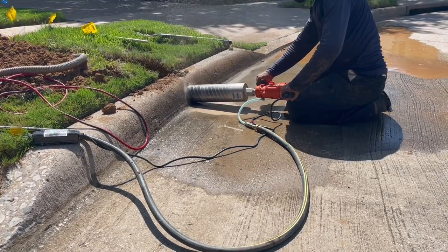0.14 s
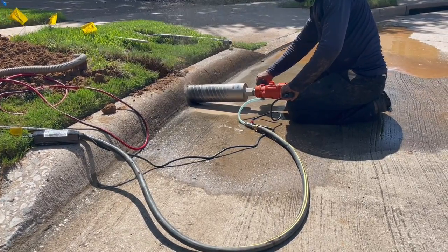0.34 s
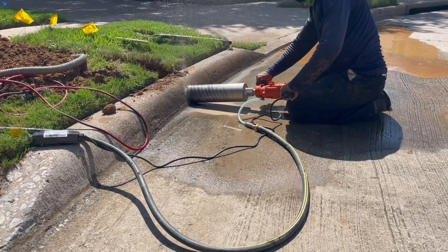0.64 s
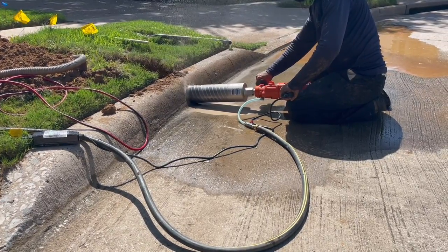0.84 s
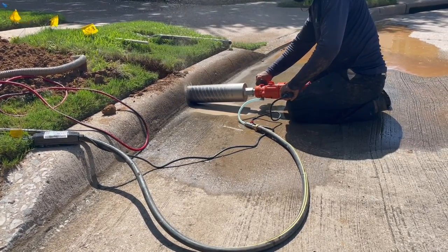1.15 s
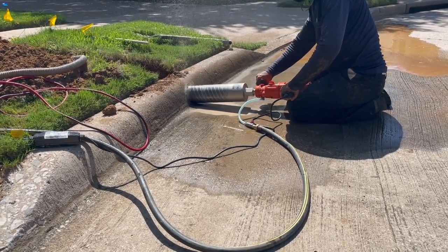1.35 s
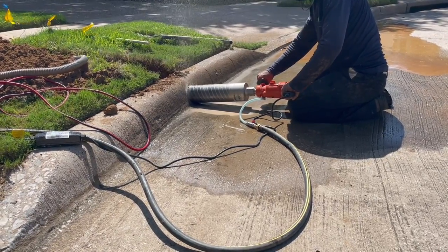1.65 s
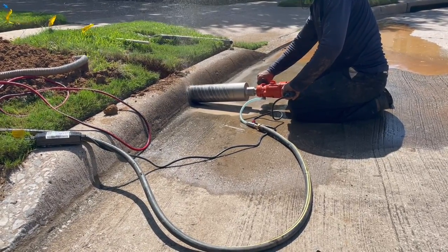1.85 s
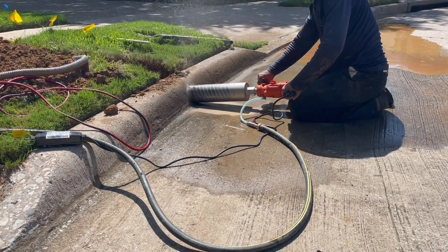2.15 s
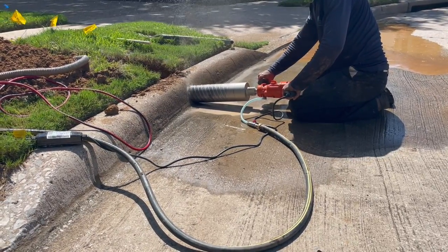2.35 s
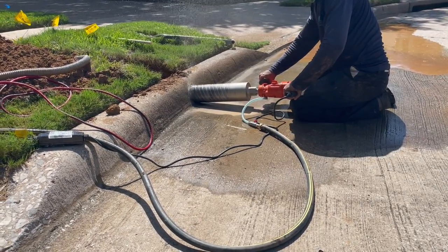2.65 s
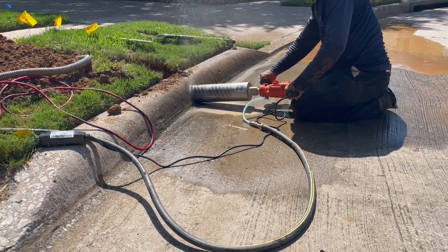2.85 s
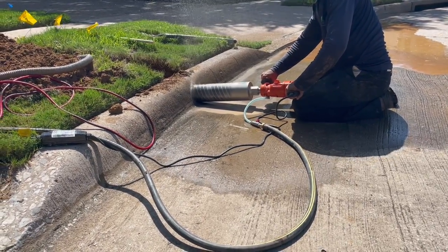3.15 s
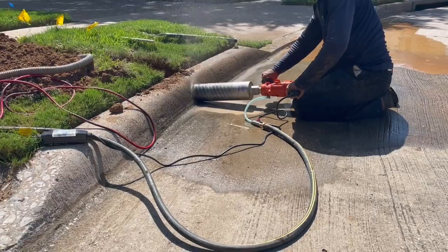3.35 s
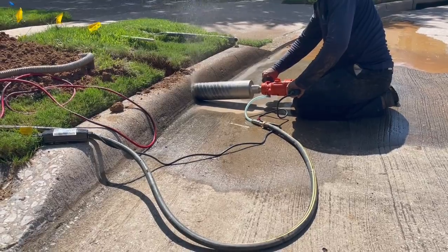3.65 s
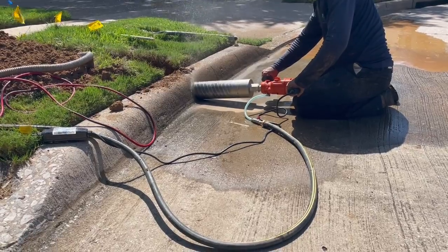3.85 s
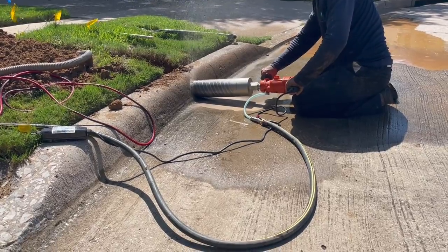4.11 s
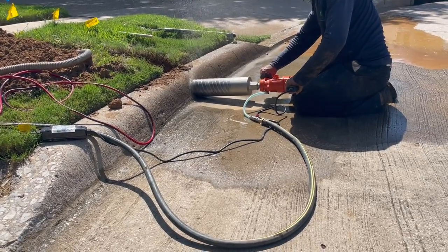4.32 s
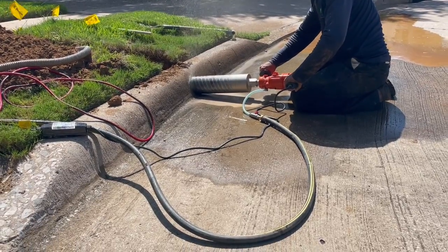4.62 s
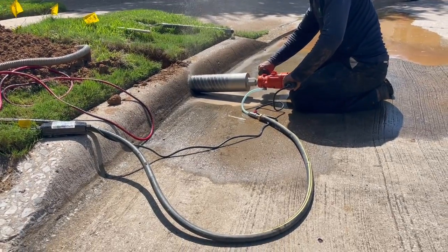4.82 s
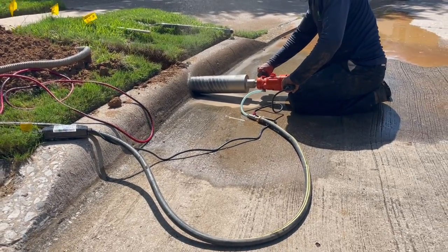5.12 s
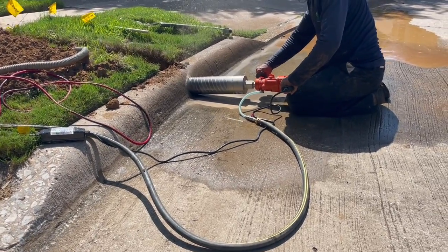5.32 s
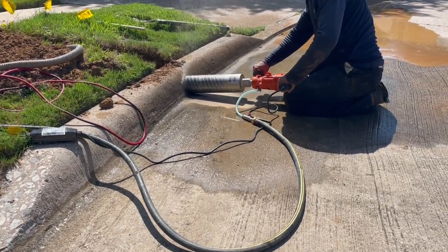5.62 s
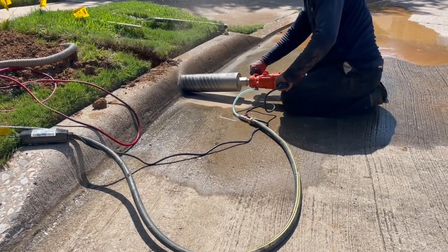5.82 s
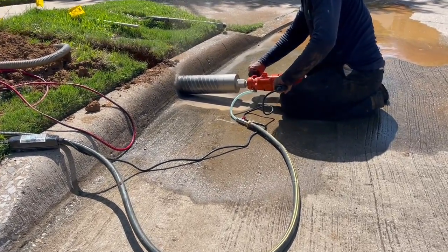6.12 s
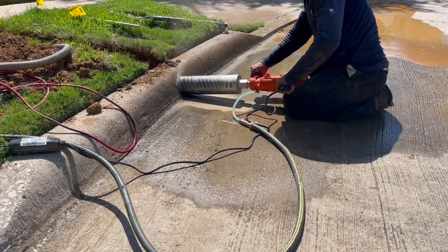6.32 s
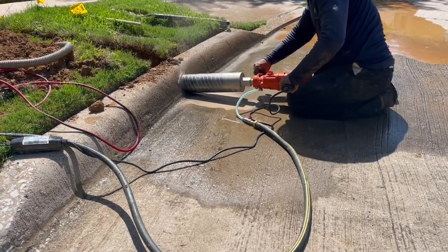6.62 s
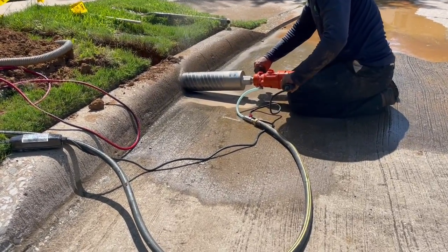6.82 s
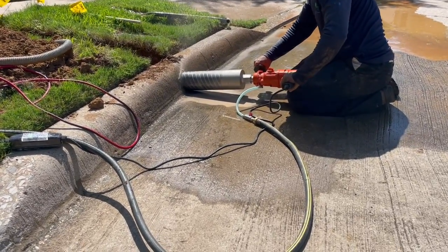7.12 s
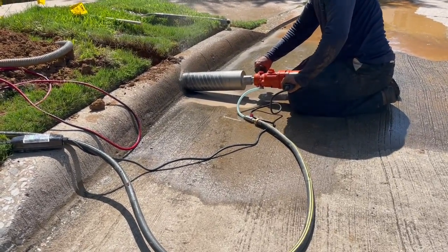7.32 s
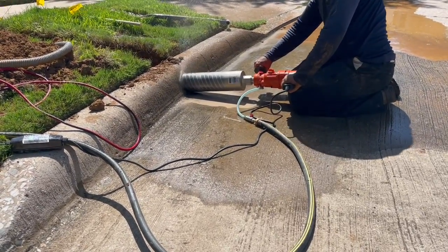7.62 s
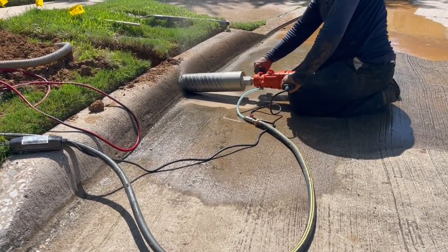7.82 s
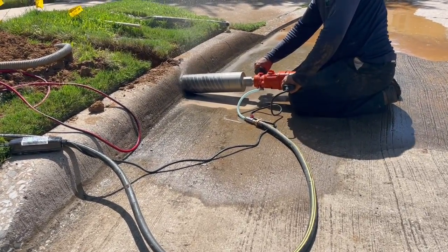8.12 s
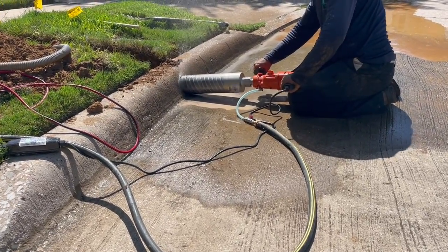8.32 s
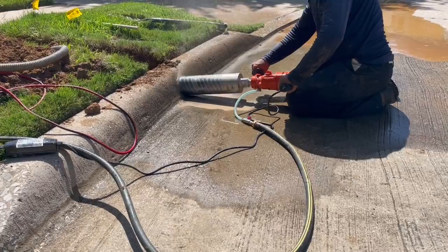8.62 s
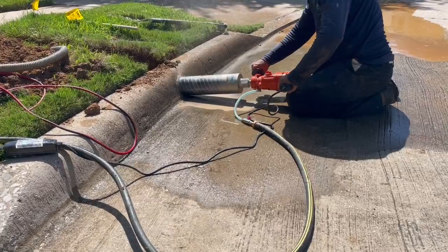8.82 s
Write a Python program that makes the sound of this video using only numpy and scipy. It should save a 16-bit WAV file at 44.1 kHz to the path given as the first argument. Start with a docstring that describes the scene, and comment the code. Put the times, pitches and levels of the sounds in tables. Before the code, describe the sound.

Outdoors at a street kerb, a handheld electric core drill grinds steadily into concrete with a wet steel barrel. Bright gritty hiss and ringing metal pulse rapidly with each turn, over a high gear whine and faint mains hum. After about five seconds it eases briefly, then runs faster and looser, rattling with knocks and snags. Soft low wind touches the nearby stereo microphone.

```python
"""Outdoors at a concrete kerb, a handheld electric core drill grinds with a wet diamond bit.
Noise for crushed grit rings filters for the steel barrel, which rubs its hole twice a turn and snags on stones.
Sine tones make the gear whine, mains hum, chatter and thin metallic tones; thuds and knocks shake the kerb.
Past halfway the bit is looser, runs faster and rattles harder. Low filtered noise is the light, puffing wind."""
import sys
import numpy as np
from scipy import signal
from scipy.fft import rfft, irfft, next_fast_len
from scipy.io import wavfile
from scipy.ndimage import uniform_filter1d, map_coordinates

SR = 44100
rng = np.random.default_rng(int(sys.argv[2]) if len(sys.argv) > 2 else 0)


def generate_wav(signal):
    """Clip the signal to [-1, 1] and save it as 16-bit WAV at the path in sys.argv[1]."""
    frames = np.transpose(np.atleast_2d(signal))
    scaled = np.clip(frames, -1, 1) * 32767
    pcm = np.round(scaled).astype(np.int16)
    wavfile.write(sys.argv[1], SR, pcm)


N = 395136  # length in samples

# motor speed: time_s, turns_per_s
MOTOR_SPEED = [(0.0, 461.5), (0.32, 459.5), (0.67, 477.5), (1.37, 480.0), (1.65, 488), (2.0, 504),
               (2.2, 504), (2.48, 494.5), (2.75, 495), (3.1, 503), (3.5, 515), (3.8, 514), (4.25, 505),
               (4.68, 507), (5.05, 488.5), (5.27, 489), (5.7, 530.5), (5.93, 522.5), (6.25, 537.5),
               (6.64, 534.0), (6.95, 561.5), (7.56, 565.5), (7.95, 547.5), (8.48, 547.5), (8.96, 529.0)]
# peaks and dips in how barrel, gearbox and hole ring: centre_hz, width_hz, snug_lift_db, loose_lift_db
BARREL_MODES = [(178, 40, 4, 4), (230, 230, 3.2, 9), (437, 66, 3, 4.2), (612, 195, 9, 10.2),
                (845, 230, 9, 7.5), (1012, 183, 6.5, 9), (1346, 230, 9.2, 7.7), (1558, 152, 2.4, -5.7),
                (1819, 139, 6.6, 5.2), (2245, 146, 4.7, 11.2), (2300, 116, -8, -6), (2470, 68, -2.8, 2),
                (2733, 200, -10, -1), (2892, 152, 6.8, 11.5), (2988, 80, 4, 8.6), (3110, 100, 8, 13),
                (3366, 126, 7.6, 14), (3513, 137, 6.6, 10.7), (3665, 82, 9, 10.2), (3908, 93, 10.2, 8.5),
                (4474, 173, 6, 4.2), (4684, 121, 11.2, 9.4), (4877, 191, 6.1, 7.9), (5094, 124, 7.3, 3.1),
                (5295, 206, -1.2, -3.6), (5386, 85, 9, 6.3), (5517, 153, 4.3, 5.1), (5649, 97, 8.8, 7.7),
                (5887, 45, 4.9, 4), (6005, 106, 4.3, 8.3), (6195, 150, 7.3, 7.1), (6342, 75, 3.1, 5.9),
                (6504, 230, 7.4, 7.6), (7868, 853, 5.5, 7.7)]
# broad tone colour of the grinding: pitch_hz, snug_db, loose_db
GRIT_SPECTRUM = [(50.0, -25.0, -25.0), (130.0, -5.8, -13.0), (350.0, -12.6, -11.8), (1100.0, -14.8, -13.9),
                 (1600.0, -8.5, 0.0), (2100.0, -2.4, -7.3), (2700.0, -3.4, -8.4), (3200.0, -4.0, -8.3),
                 (4200.0, -8.8, -6.1), (7000.0, -5.9, -6.2), (9600.0, -7.2, -5.0), (11000.0, -8.7, -5.2),
                 (13000.0, -12.6, -10.4), (15000.0, -10.9, -8.4)]
# the bit catches on a stone: time_s, strength_db (relative; catches() adds a shared boost)
CATCHES = [(2.141, -14), (3.6182, -15), (4.2323, -14.5), (4.4653, -18), (6.498, -15), (6.608, -14),
           (6.928, -15), (6.955, -12), (7.007, -14), (7.039, -14), (7.0948, -14), (7.387, -14),
           (7.762, -13), (7.787, -13), (7.816, -15.5), (8.1668, -13), (8.1963, -16), (8.2242, -15),
           (8.253, -13), (8.6108, -16), (8.7475, -17)]
# tones of gears and cutting segments: multiple_of_bit_speed, snug_db, loose_db (before a shared trim)
GEAR_TONES = [(5, -58, -57), (6, -62, -56), (12, -61, -57), (13, -60, -57), (16, -54, -56), (23, -54, -54),
              (27, -49.5, -46.5), (37.25, -58, -66), (41, -49.5, -60), (44, -56, -62), (46, -52.5, -55)]
# stereo colour of the drill: pitch_hz, left_minus_right_db, left_lead_rad, likeness_0_to_1
STEREO_COLOUR = [(100, .2, 0, .95), (700, 1.8, .21, .99), (1800, -1, 0, .97), (2250, 0, .05, .96),
                 (2480, -.8, .35, .76), (2650, .5, 1.3, .55), (2740, 1, 2.7, .7), (2900, 1.8, 2.8, .8),
                 (3100, 2.2, 2.3, .9), (3300, 3, 2.8, .8), (3470, 7, 2.1, .75), (3680, 8, 2.5, .68),
                 (3900, 2.8, 1, .78), (4200, 6, .7, .28), (4500, 4, .1, .7), (4700, 3.2, .7, .89),
                 (5080, 3, 1.4, .7), (5390, 6, 1.8, .52), (5650, 4.5, 4.78, .64), (5850, -1.2, 5.4, .6),
                 (6200, -1.5, 5.85, .89), (6550, .1, 5.9, .84), (6950, 0, 5.85, .66), (7450, 1.8, 3.3, .65),
                 (7700, 0, 3.23, 1), (8550, 0, 3.09, 1), (10100, 0, 1.38, .98), (10800, 0, 0, 1),
                 (12500, 0, -.05, 1), (12900, 0, -1.12, .98), (14300, 0, -3.13, 1)]
# tone colour of the wind: pitch_hz, relative_density_db_per_hz
WIND_SPECTRUM = [(15, -28), (28, -19), (45, -5.5), (62, 2), (100, -1), (160, -6), (400, -21), (1500, -80)]
# whine of the motor's small gear, before the casing boosts it: time_s, level_db
WHINE_LEVEL = [(.3, -55), (.7, -50), (1.4, -50.5), (2.1, -51), (3.6, -55), (4.2, -55), (4.6, -51),
               (5.1, -52), (5.7, -48), (6.7, -49), (7, -58), (8.9, -54)]
# the bit chatters on an overtone: centre_s, half_length_s, multiple_of_bit_speed, level_db (before a shared trim)
CHATTER = [(.3, .19, 20, -44), (.3, .19, 22, -45), (.3, .2, 5, -45.5), (5.9, .06, 7, -43),
           (6.53, .06, 6, -43), (7.7, 1, 23, -48), (7.8, 1.2, 16, -49), (8.68, .11, 16, -44)]
# thin metallic tones swell up: centre_s, half_length_s, pitch_hz, level_db (before a shared boost)
METALLIC_TONES = [(.15, .3, 4665, -41), (1.7, .35, 3895, -44), (2.3, .45, 3110, -41), (3.3, .6, 3905, -45),
                  (3.6, .2, 4700, -43.5), (3.65, .3, 6190, -41.5), (4.35, .15, 4695, -42),
                  (4.65, .15, 3915, -42), (5.15, .3, 3500, -42), (5.9, .5, 3520, -38.5),
                  (6.95, .3, 3380, -38.5), (8.13, .1, 2425, -44), (8.15, .15, 3380, -39),
                  (8.75, .25, 3380, -37.5)]
# edges between the bands of hole, slab, steel and fizz: edge_hz
BAND_EDGES = [480, 2400, 7200]
# how hard the drill is pushed: time_s, feed_db
FEED = [(0, -0.6), (1.4, -0.5), (2, 0.4), (2.4, 0), (3.6, 0.8), (4.4, 1), (5.3, -2.5), (5.7, -0.2),
        (6.55, 1), (6.75, -0.5), (7, 0.5), (7.62, 1.5), (7.78, 3), (8.35, 2.5), (8.65, 4), (8.96, 2)]
# the bit binds, or runs free if a lift is negative: centre_s, half_length_s, slab_lift_db, hole_lift_db
BINDS = [(0.233, 0.12, 3.5, 1.5), (0.443, 0.049, 4, 3), (1.898, 0.12, 1.5, 0.5), (3.687, .07, 1.5, 4.5),
         (5.102, 0.7, -2, -3), (5.885, 0.1, 5, 6.5), (6.11, 0.1, 4.5, 3), (6.416, 0.057, 2.5, 1.5),
         (6.54, 0.12, 3, 4), (7.06, 0.072, 3.5, 3.5), (8.673, 0.07, 0.5, 1)]
# the bit slams the wall of the hole: time_s, strength_db (over the grinding)
THUDS = [(3.659, 6), (3.709, 5), (3.825, 8.5), (5.21, 4.5), (5.889, 6), (5.918, 7), (6.122, 6), (6.418, 7),
         (6.526, 10), (6.554, 8), (8.167, 5), (8.225, 5.5), (8.704, 6)]
# ways the kerb rings under a slam: pitch_hz, relative_level_db (before each slam's random share)
KERB_MODES = [(210, -2), (400, -2), (600, 0), (860, 0), (1350, -2)]
# puffs of wind on the microphone: centre_s, half_length_s, level_db
PUFFS = [(0.097, .06, -48), (0.887, 0.14, -44), (1.54, .04, -43.5), (2.43, .025, -46), (3.502, 0.089, -47),
         (3.614, 0.023, -43), (4.61, 0.017, -39), (5.393, .025, -43), (7.338, 0.086, -46)]

GEAR_RATIO = 14.9  # motor turns for one turn of the bit
PINION_TEETH = 5
HUM_HZ = 120  # one cycle for each half wave of the mains
TOP_HZ = 15750  # nothing above this is kept
LOOSEN_S, LOOSEN_TAKES_S = 5.42, 0.8  # middle of the moment the bit works loose, and how long that takes
LOOSE_SHARPENS = .00245  # share by which the barrel's modes rise once it is loose
GROOVE_SHARE, GROOVE_LASTS_TURNS = .2, 7  # share of grit power that repeats each turn; turns until it is new
# levels at neutral feed (dB), their growth per dB of feed, and their change once the bit is loose (dB)
HOLE_DB, HOLE_PER_FEED, HOLE_LOOSE_DB = -47, 0.37, -0.16
SLAB_DB, SLAB_PER_FEED, SLAB_LOOSE_DB = -36.5, 0.53, 0
STEEL_DB, STEEL_PER_BIND = -32, 0.35  # steel follows the feed fully and takes this share of the slab's lift
CASING_HZ, CASING_WIDTH_HZ, CASING_DB = 2424, 140, 6.5  # gearbox resonance that boosts the passing whine
BREEZE_DB, BREEZE_EARLY_DB, BREEZE_EASES_S = -55.5, 4.5, 1.9  # base wind, its extra at first, time to ease
THUD_ATTACK_S, THUD_DECAY_S = .002, .006
CRUNCH_SHARE = .5  # share of a slam that crushes extra grit
KNOCK_DB, KNOCK_T60_S = -34.5, .028  # base level of a knock, and the time it takes to fall 60 dB


def amp(db):
    """Turn decibels into a gain."""
    return 10 ** (np.asarray(db) / 20)


def unit(x):
    """Scale to an rms (average strength) of 1."""
    return x / np.sqrt(np.mean(x ** 2) + 1e-20)


def along(points, hz):
    """Read each column of a spectrum table on a log frequency axis."""
    table_hz, *columns = np.transpose(points)
    return [np.interp(np.log(hz + 1), np.log(table_hz + 1), column) for column in columns]


def curve(rows):
    """Join (time, value) rows into one value per sample."""
    return np.interp(np.arange(N) / SR, *np.transpose(rows))


def wobble(rate):
    """A smooth random curve through this many random points a second."""
    points = rng.standard_normal(int(N * rate / SR) + 4)
    return map_coordinates(points, [np.arange(N) * rate / SR])


def swell(s, half):
    """A smooth bump of height 1 around time s."""
    distance = (np.arange(N) / SR - s) / half
    return np.exp(-np.minimum(distance ** 2, 20))


def filtered(x, response):
    """Change the strength and phase of each frequency in x."""
    size = next_fast_len(N + SR // 2, True)
    hz = np.fft.rfftfreq(size, 1 / SR)
    return irfft(rfft(x, size) * response(hz), size)[..., :N]


def band_rms(x, lo_hz, hi_hz):
    """Measure the strength of x inside one band."""
    return np.std(filtered(x, lambda hz: (hz > lo_hz) & (hz < hi_hz)))


def split(x):
    """Split x into four neighbouring bands that add up to it: hole, slab, steel and fizz."""
    lows = [filtered(x, lambda hz: 1 / (1 + (hz / edge) ** 10)) for edge in BAND_EDGES]
    return np.diff([np.zeros_like(x), *lows, x], axis=0)


def looseness():
    """Play of the bit in its hole: 0 while snug, 1 once it has worked loose."""
    return np.clip(.5 + (np.arange(N) / SR - LOOSEN_S) / LOOSEN_TAKES_S, 0, 1)


def tone(turns, stray_rad, flutter_db):
    """A sine of rms near 1 whose phase and strength waver."""
    phase = 2 * np.pi * turns + stray_rad * wobble(40)
    return np.sqrt(2) * np.sin(phase) * amp(flutter_db * wobble(25))


def stereo(pair):
    """The first signal goes left and right with a lead and a level gap; the second makes the sides less alike."""
    def paths(hz):
        balance_db, lead, alike = along(STEREO_COLOUR, hz)
        turn = np.arccos(np.clip(alike, 0, .999)) / 2  # a larger turn mixes in more of the second signal
        left = amp(balance_db / 2) * np.exp(.5j * lead)
        left_mix = [left * np.cos(turn), left * np.sin(turn)]
        right_mix = [np.cos(turn) / left, -np.sin(turn) / left]
        return np.array([left_mix, right_mix]) / np.hypot(abs(left), 1 / abs(left))
    return filtered(pair, paths).sum(axis=1)


def grinding(bit_turns):
    """Diamonds crush grit in clumps of many sizes; the grains ring the barrel and shake the concrete."""
    loose = looseness()
    hole_db, slab_db, steel_db = effort(bit_turns, loose)
    grains = split(groove(bit_turns) * unit(amp(1.0 * wobble(5000))))
    # each band gets its own clumps
    clumps = sum(band * amp(1.37 * wobble(450) + 0.75 * wobble(60)) for band in grains)
    force = drifting(clumps * pressure(bit_turns, loose), depth_db=1.6, width_hz=35, rate=3.5)
    snug_ring = np.sqrt(1 - loose) * ring(force, index=0)
    loose_ring = np.sqrt(loose) * ring(force, index=1)
    sound = stereo(snug_ring + loose_ring)

    hole, slab, steel, fizz = split(sound)
    mid = sound.mean(axis=0)
    hole = filtered(hole, lambda hz: hz ** 4 / (hz ** 4 + 118 ** 4))  # so small a hole radiates no deep bass
    hole = hole * amp(hole_db) / band_rms(mid, 190, 500)
    slab = slab * amp(slab_db) / band_rms(mid, 500, 2200)
    steel = (steel + fizz) * amp(steel_db) / band_rms(mid, 2800, 7000)
    return hole + slab + steel


def groove(bit_turns):
    """Gritty force: partly fresh, partly the same groove bumps met again each turn until they wear away."""
    bumps = rng.standard_normal((64, 1250))  # rows: stages of wear; columns: places around the groove
    place = [bit_turns / GROOVE_LASTS_TURNS, bit_turns % 1 * bumps.shape[1]]
    track = unit(map_coordinates(bumps, place, mode="mirror"))
    fresh, second = rng.standard_normal((2, N))
    first = np.sqrt(GROOVE_SHARE) * track + np.sqrt(1 - GROOVE_SHARE) * fresh
    return np.array([first, second])  # the pair that stereo() mixes


def pressure(bit_turns, loose):
    """The barrel scrapes one wall of the hole, then the other, and now and then snags."""
    first = rubs(bit_turns, scatter=0.022, decay_turns=0.3, uneven_db=0.5)
    second = rubs(bit_turns + .5, scatter=0.04, decay_turns=0.11, uneven_db=3.5)
    scrape = (1.35 + 0.25 * loose) * first + (.55 + 0.5 * loose) * second
    scrape = uniform_filter1d(scrape, size=170)  # slurry softens each bite
    # motor torque ripples with each half wave of the mains
    ripple = 1 + 0.12 * (1 - 0.94 * loose) * np.sin(2 * np.pi * HUM_HZ * np.arange(N) / SR)
    return np.hypot(unit(np.hypot(ripple, scrape)), catches(boost_db=22.5, t60=0.034))


def rubs(turns, scatter, decay_turns, uneven_db):
    """One scrape a turn: a sudden bite that dies away, each with its own moment and strength."""
    count = int(turns[-1]) + 2
    chance = rng.standard_normal((count, 2))
    starts = np.sort(np.arange(count) - 1 + scatter * chance[:, 0])
    last = np.maximum(np.searchsorted(starts, turns) - 1, 0)  # the latest scrape at each sample
    strength = amp(uneven_db * chance[last, 1])
    return strength * np.exp(-np.abs(turns - starts[last]) / decay_turns)


def effort(bit_turns, loose):
    """Levels of hole, slab and steel in dB grow with the feed; a binding bit knocks the concrete once a turn."""
    feed = curve(FEED)
    knocks = rubs(bit_turns, scatter=.03, decay_turns=0.97, uneven_db=3.0)
    jolt = 1 + 0.23 * (unit(uniform_filter1d(knocks, size=130)) - 1)
    binds_db = sum(np.outer(lifts, swell(s, half)) for s, half, *lifts in BINDS)
    jolted = 1 + (amp(binds_db) - 1) * jolt
    slab_lift, hole_lift = 20 * np.log10(np.maximum(jolted, .1)) + thuds()
    hole_db = HOLE_DB + HOLE_PER_FEED * feed + HOLE_LOOSE_DB * loose + hole_lift
    slab_db = SLAB_DB + SLAB_PER_FEED * feed + SLAB_LOOSE_DB * loose + slab_lift
    steel_db = STEEL_DB + feed + STEEL_PER_BIND * slab_lift
    return hole_db, slab_db, steel_db


def drifting(force, depth_db, width_hz, rate):
    """Water film and contact points shift, so the barrel's close modes slowly trade strength."""
    hz, t, z = signal.stft(force, SR, nperseg=2048)
    field = rng.standard_normal((1200, 80))  # a random map over frequency and time
    place = np.meshgrid(hz / width_hz, t * rate, indexing="ij")
    reach = np.interp(hz, [2400, 3000, 7000, 11000], [.4, 1, 1, .4])[:, None]  # fullest from 3 to 7 kHz
    gain = amp(depth_db * reach * map_coordinates(field, place, mode="mirror"))
    gain /= np.sqrt(np.mean(gain ** 2, axis=1, keepdims=True))  # each frequency's mean power gain is 1
    return signal.istft(z * gain, SR, nperseg=2048)[1][:, :N]


def ring(force, index, size=8192):
    """The barrel rings after each push; index 0 is a snug bit, 1 a loose one, which rings a little sharp."""
    hz = np.fft.rfftfreq(size, 1 / SR)
    sharp = 1 + LOOSE_SHARPENS * index
    db = along(GRIT_SPECTRUM, hz)[index]
    for centre, width, *lift in BARREL_MODES:
        db = db + lift[index] / (1 + (2 * (hz - sharp * centre) / width) ** 2)
    # fold the log spectrum's transform forward, so that no ring comes before its push
    cepstrum = irfft(np.log(amp(db)))
    cepstrum[1:size // 2] *= 2
    cepstrum[size // 2 + 1:] = 0
    response = irfft(np.exp(rfft(cepstrum)))
    response /= np.linalg.norm(response)
    return signal.fftconvolve(force, response[None], axes=1)[:, :N]


def motor(bit_turns, gears_db, hum_db, ripple):
    """The five-toothed pinion whines, pulsing with the mains; under it are slower gears, cutting segments and hum."""
    loose, mains_turns = looseness(), HUM_HZ * np.arange(N) / SR
    mesh_hz = PINION_TEETH * curve(MOTOR_SPEED)  # teeth meeting each second
    casing_db = CASING_DB / (1 + (2 * (mesh_hz - CASING_HZ) / CASING_WIDTH_HZ) ** 2)
    whine = tone(PINION_TEETH * GEAR_RATIO * bit_turns, stray_rad=.12, flutter_db=1)
    whine = whine * amp(curve(WHINE_LEVEL) + casing_db)
    whine = whine * (1 + ripple * np.sin(2 * np.pi * mains_turns))
    gears = np.zeros(N)
    for multiple, snug_db, loose_db in GEAR_TONES:
        level_db = snug_db + (loose_db - snug_db) * loose + gears_db
        gears += amp(level_db) * tone(multiple * bit_turns, stray_rad=0.15, flutter_db=1.2)
    hum = amp(hum_db) * (1 - 0.22 * loose) * tone(mains_turns, stray_rad=.12, flutter_db=0.5)
    return whine + gears + hum


def wind(side_db, lumps_db):
    """An easing breeze with soft low puffs, nearly alike on the left and right."""
    noise = rng.standard_normal((2, N))
    mid, side = unit(filtered(noise, lambda hz: amp(along(WIND_SPECTRUM, hz)[0])))
    side = amp(side_db) * side
    breeze = amp(BREEZE_DB + BREEZE_EARLY_DB * swell(0, BREEZE_EASES_S)) * unit(amp(lumps_db * wobble(15)))
    puffs = sum(amp(db) * swell(s, half) for s, half, db in PUFFS)
    return np.hypot(breeze, puffs) * np.array([mid + side, mid - side])


def metallic_tones(boost_db):
    """Thin metallic tones swell up and fade: sines at fixed pitches whose phase and strength waver."""
    t, tones = np.arange(N) / SR, np.zeros(N)
    for s, half, hz, db in METALLIC_TONES:
        tones += amp(db + boost_db) * swell(s, half) * tone(hz * t, stray_rad=1.3, flutter_db=2.5)
    return stereo(np.array([tones, np.zeros(N)]))  # the second signal is silent


def chatter(bit_turns, trim_db):
    """The bit groans roughly: wavering tones at multiples of its speed swell up and fade."""
    t, groans = np.arange(N) / SR, np.zeros(N)
    for s, half, multiple, db in CHATTER:
        envelope = np.exp(-((t - s) / half) ** 4)
        groans += amp(db + trim_db) * envelope * tone(multiple * bit_turns, stray_rad=.9, flutter_db=3)
    return groans


def catches(boost_db, t60):
    """Bursts of force build up and let go where the diamonds snag on a stone."""
    force, t = np.zeros(N + SR), np.arange(SR // 20) / SR
    burst = amp(boost_db - 60 * t / t60) * (1 - np.exp(-t / 0.0018))
    for s, db in CATCHES:
        start = round((s - .0015) * SR)  # the force starts to build just before the listed time
        force[start:][:len(t)] += amp(db) * burst
    return force[:N]


def thuds():
    """Lift in dB of the concrete's sound as the bit slams the wall of the hole and crushes extra grit."""
    t, gain = np.arange(N) / SR, np.zeros(N)
    for s, db in THUDS:
        attack = np.clip((t - s) / THUD_ATTACK_S, 0, 1)
        gain += (amp(db) - 1) * attack * np.exp(-np.abs(t - s) / THUD_DECAY_S)
    return 20 * np.log10(1 + CRUNCH_SHARE * gain)


def kerb_knocks():
    """Each slam also knocks the kerb, whose damped modes share the blow differently every time."""
    sound, t = np.zeros(N + SR), np.arange(SR // 10) / SR
    fade = amp(KNOCK_DB - 60 * t / KNOCK_T60_S)
    for s, strength_db in THUDS:
        shares_db = rng.normal(0, 3.2, len(KERB_MODES))
        modes = np.zeros(len(t))
        for k, (hz, db) in enumerate(KERB_MODES):
            modes += (-1) ** k * amp(db + shares_db[k]) * np.sin(2 * np.pi * hz * t)
        sound[round(s * SR):][:len(t)] += (amp(strength_db) - 1) * fade * modes
    return sound[:N]


def scene():
    """One motor shaft drives the gears and the bit; wind, metallic tones and kerb knocks are added."""
    motor_speed = curve(MOTOR_SPEED) * (1 + 0.0007 * wobble(14))  # turns a second, slightly unsteady
    bit_turns = np.cumsum(motor_speed) / SR / GEAR_RATIO
    drill = grinding(bit_turns) + motor(bit_turns, gears_db=-3.5, hum_db=-59, ripple=0.62)
    air = wind(side_db=-14.0, lumps_db=2.0)
    metallic = metallic_tones(boost_db=4.0)
    return drill + air + metallic + chatter(bit_turns, trim_db=-4.5) + kerb_knocks()


def record(dry):
    """Keep nothing above the band limit."""
    return filtered(dry, lambda hz: hz < TOP_HZ)


dry = scene()
out = record(dry)
generate_wav(out)
```